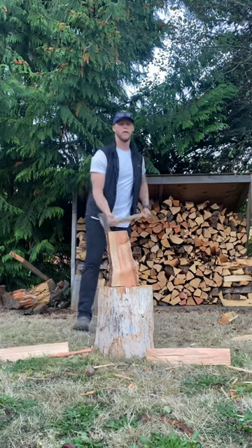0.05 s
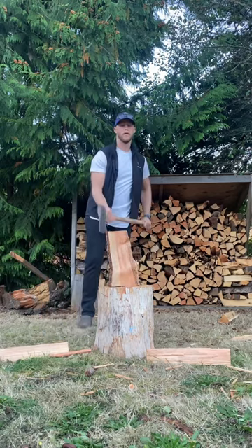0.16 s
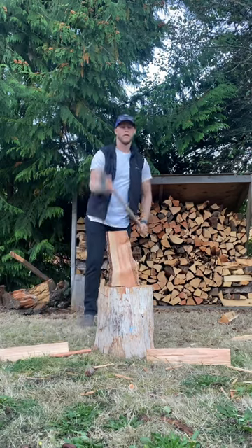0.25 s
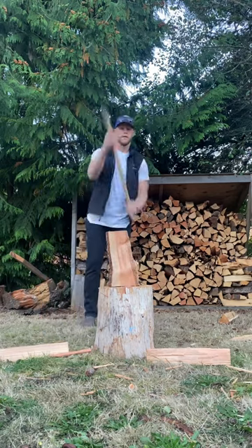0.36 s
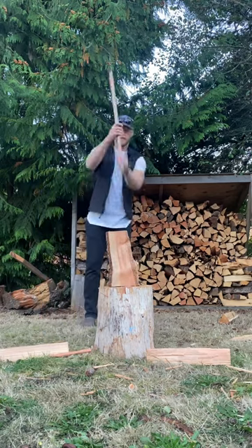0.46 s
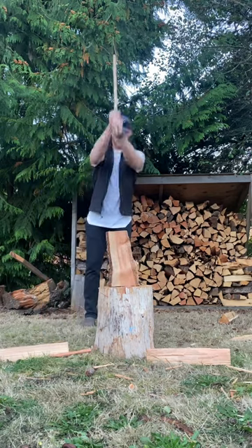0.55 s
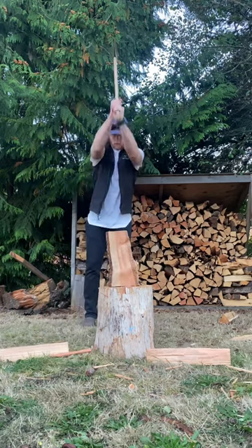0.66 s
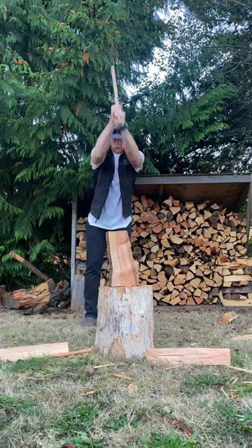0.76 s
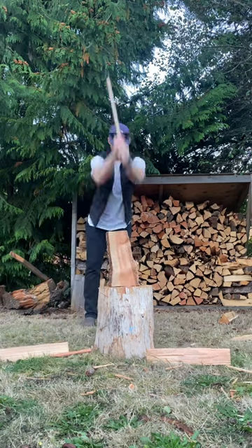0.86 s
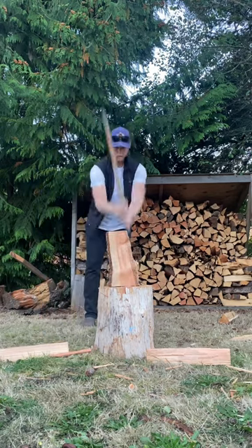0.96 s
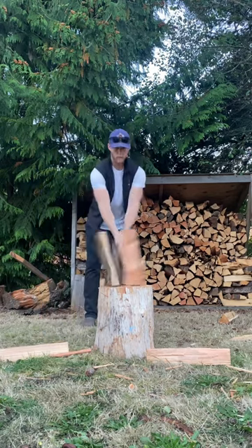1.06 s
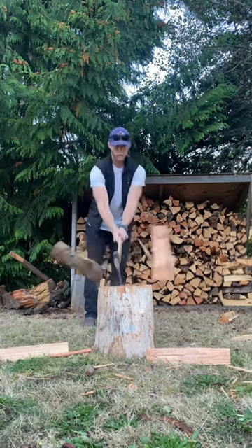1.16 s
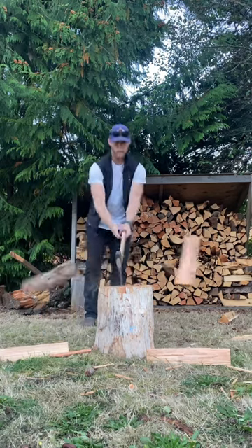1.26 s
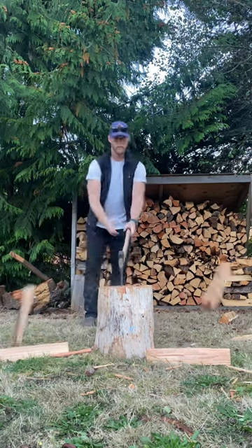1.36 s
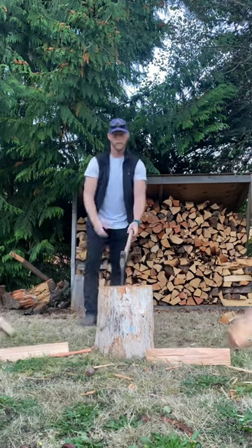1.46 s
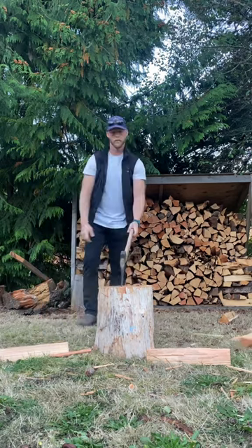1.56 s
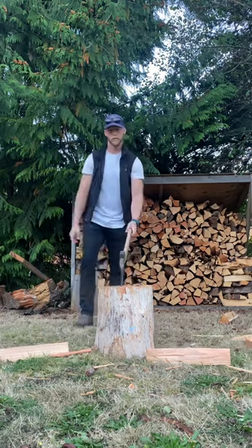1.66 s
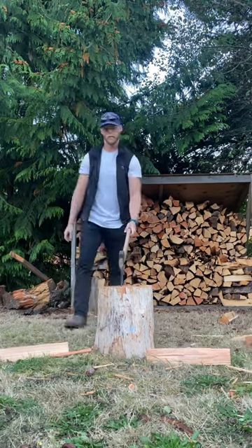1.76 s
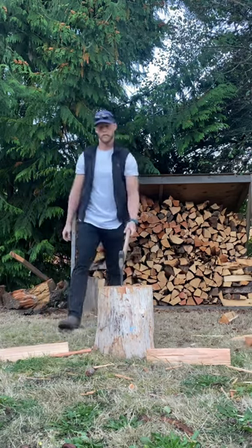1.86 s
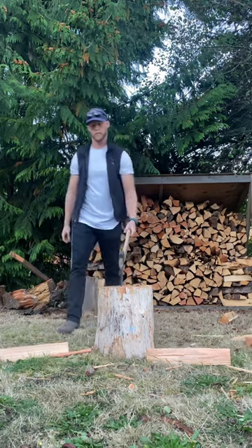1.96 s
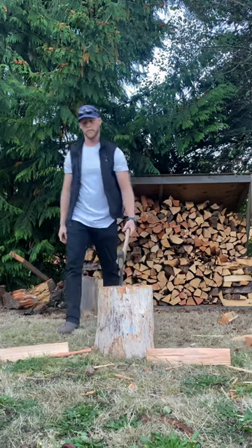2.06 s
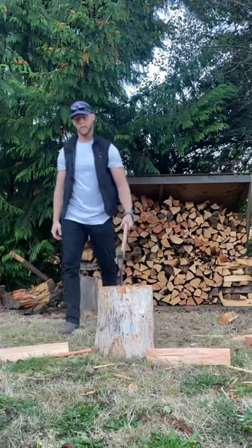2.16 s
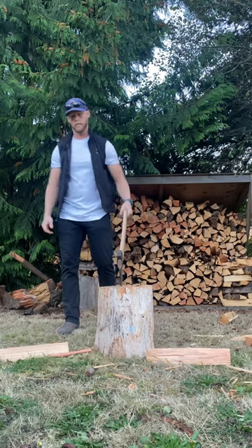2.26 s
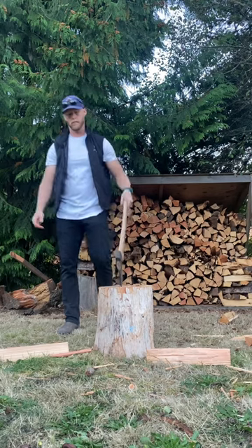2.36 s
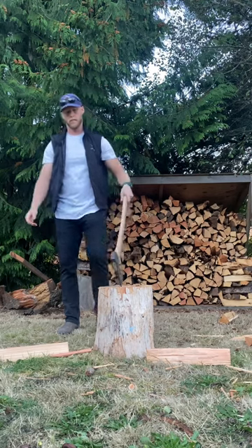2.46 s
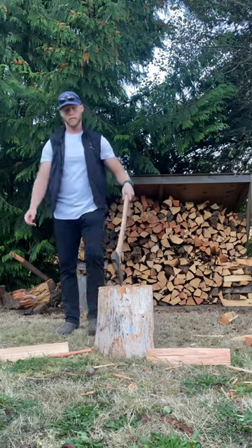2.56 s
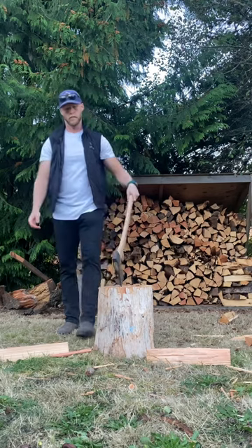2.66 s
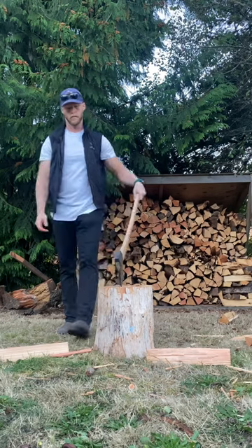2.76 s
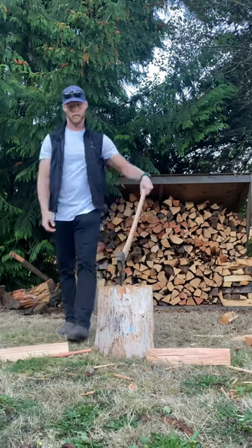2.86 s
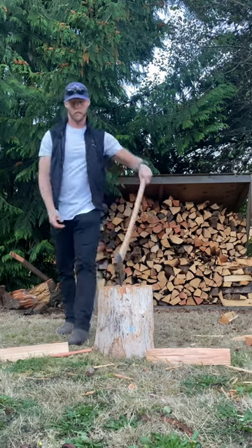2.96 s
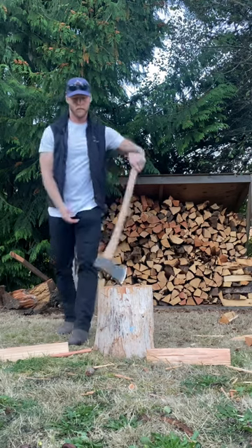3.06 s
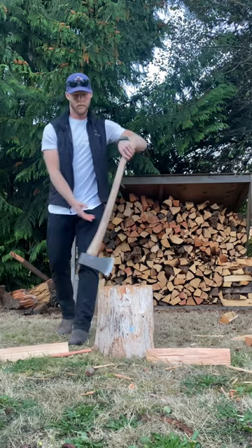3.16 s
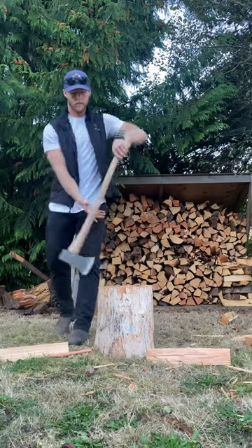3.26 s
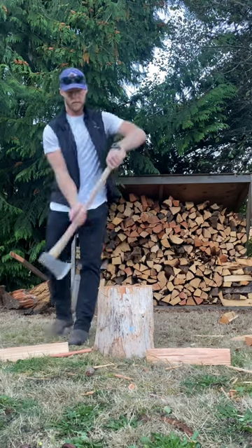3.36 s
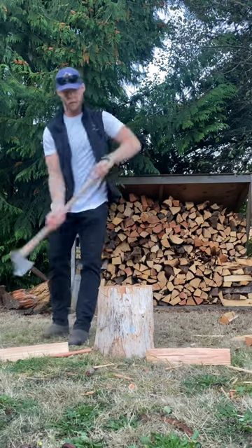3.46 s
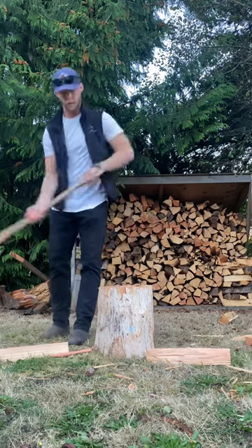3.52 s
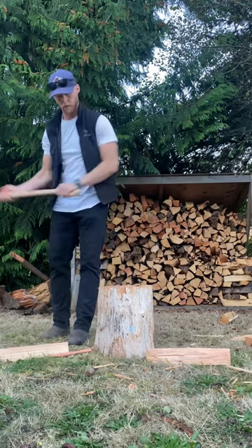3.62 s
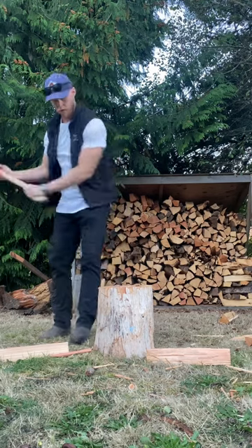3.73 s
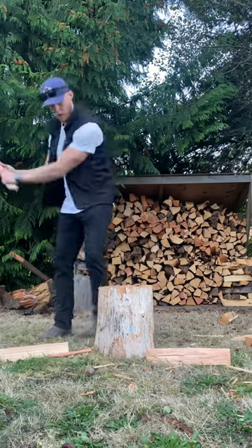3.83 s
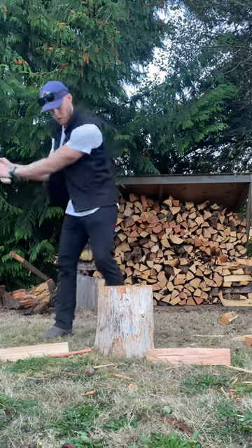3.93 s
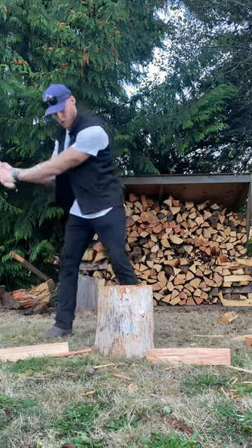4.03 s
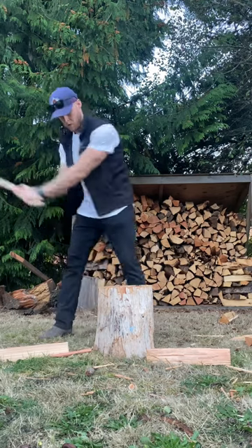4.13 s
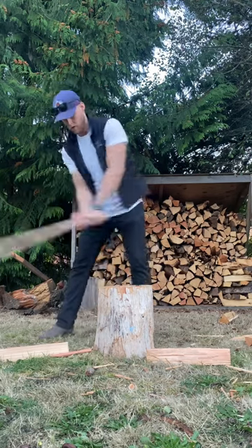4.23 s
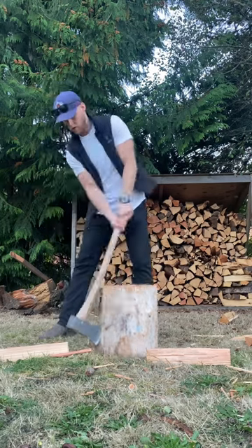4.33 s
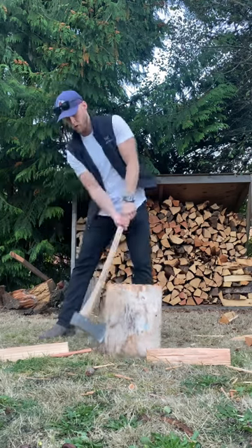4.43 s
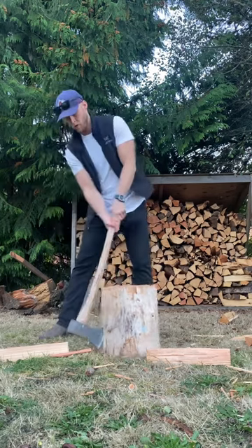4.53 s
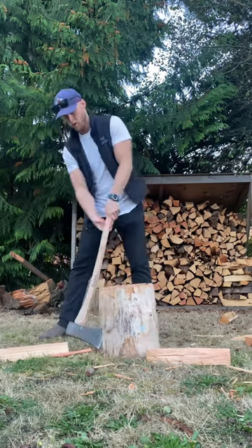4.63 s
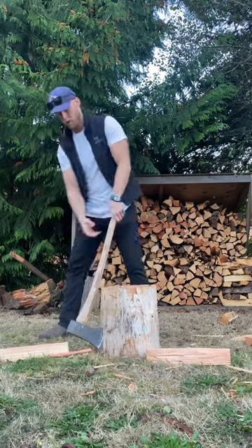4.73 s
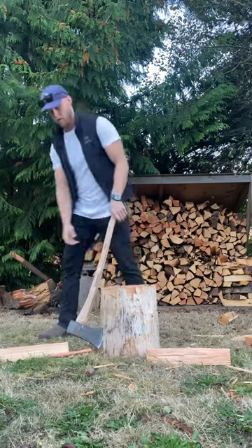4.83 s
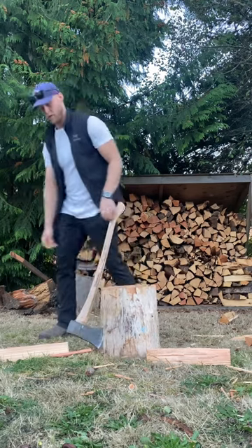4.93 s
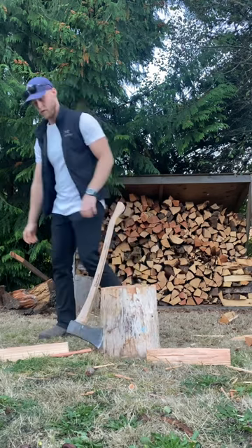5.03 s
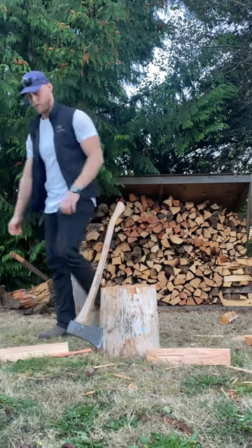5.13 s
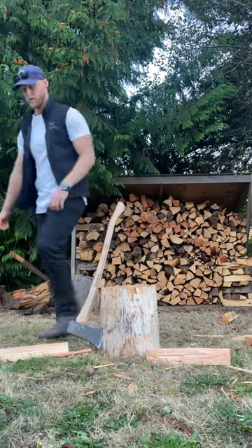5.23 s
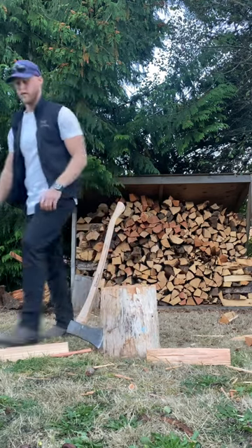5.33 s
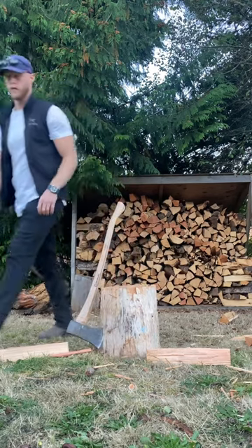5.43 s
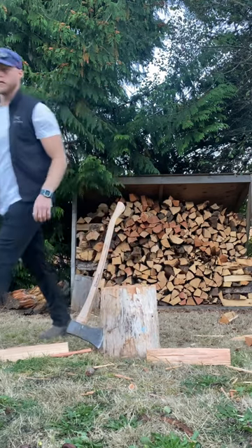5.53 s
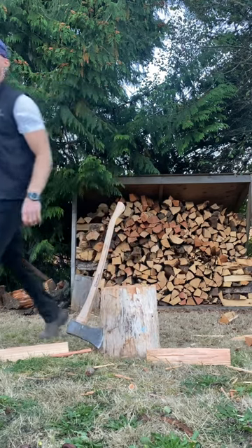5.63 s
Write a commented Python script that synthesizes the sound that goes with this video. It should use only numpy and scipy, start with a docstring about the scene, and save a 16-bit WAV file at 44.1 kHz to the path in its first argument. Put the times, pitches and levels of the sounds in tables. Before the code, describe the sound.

An axe splits a log with a loud crack, halves thud and clack, then a second sharp chop bites the block as birds twitter outdoors.

```python
"""A garden, with a phone a few metres off: distant traffic hums, a small bird twitters, clothes and grass rustle.
Twigs snap and boots thud softly, then an axe splits a log on a chopping block: noise bursts ring its modes.
The halves thud on the grass as sagging low tones and clack against other wood, a click and a short ring.
A second, low swing bites into the side of the block and rings that instead; the axe head thuds on the ground.
Woodpile and trees throw the blows back as scattered, fading echoes."""
import sys
import numpy as np
from scipy import signal
from scipy.fft import rfft, irfft
from scipy.io import wavfile

SR = 44100
rng = np.random.default_rng(int(sys.argv[2]) if len(sys.argv) > 2 else 0)


def master_out(mix):
    """Clip the mix to full scale and print it as 16-bit PCM to the path in sys.argv[1]."""
    frames = np.transpose(np.atleast_2d(mix))
    ceiling = np.clip(frames, -1, 1)
    pcm = np.round(ceiling * 32767).astype(np.int16)
    wavfile.write(sys.argv[1], SR, pcm)


N = 250784
T = np.arange(N) / SR
HIT_T = T[:SR // 2]  # time axis of one blow
SECOND_SWING_S = 3  # blows after this belong to the second swing


def undb(db):
    """Decibels to amplitude gain."""
    return 10 ** (np.asarray(db) / 20)


def along(points, hz):
    """Gain read from a (Hz, dB) table on a log-frequency axis."""
    table_hz, db = np.transpose(points)
    return undb(np.interp(np.log(hz), np.log(table_hz), db))


def fade(t, t60):
    """Exponential decay, 60 dB down after t60 seconds."""
    return np.exp(-np.log(1000) * t / t60)


def swell(middle_s, half_s):
    """A smooth, bell-shaped rise and fall around one moment."""
    return np.exp(-((T - middle_s) / half_s) ** 2)


def wander(t, step):
    """Random values drawn every few samples and joined by straight lines."""
    knots = t[::step]
    return np.interp(t, knots, rng.standard_normal(len(knots)))


def add(out, start_s, x):
    """Mix x into out from start_s, dropping what runs past the end."""
    i = max(int(start_s * SR), 0)
    out[:, i:i + x.shape[-1]] += x[..., :max(N - i, 0)]


def noise(colour, side, size, tilt_db=0):
    """Stereo noise of rms 1, shaped in spectrum and in width; the tilt is in dB per octave."""
    hz = np.maximum(np.fft.rfftfreq(size, 1 / SR), 1)
    mid, other = rfft(rng.standard_normal((2, size)))
    width = along(side, hz)
    gain = along(colour, hz) * undb(tilt_db * np.log2(hz)) / np.sqrt(1 + width ** 2)
    x = irfft(gain * np.array([mid + width * other, mid - width * other]), size)
    return x / x.std()


# Stereo width of sounds close by at the microphone pair. Each row: frequency in Hz, side against mid in dB.
NEAR_SIDE = [(100, -14), (1000, -16), (2400, -9), (4400, -8), (8000, -1), (15000, -0.5)]


def burst(colour, t60, tilt_db=0, grain_db=3, rise_s=0.00008):
    """Breaking fibres: a sharp burst of noise with a grainy level that rises at once and dies away."""
    size = len(HIT_T)
    grain = undb(grain_db * wander(HIT_T, 16))
    grain = grain / np.sqrt(np.mean(grain ** 2))
    envelope = fade(HIT_T, t60) * (1 - np.exp(-HIT_T / rise_s))
    return noise(colour, NEAR_SIDE, size, tilt_db) * grain * envelope


def ring(modes, push_s, ratio=1, spread_hz=1300):
    """Damped modes that build up while the blow pushes; high ones reach the two ports out of step."""
    t = HIT_T * ratio  # a higher ratio raises the pitch and shortens the decay
    x = 0
    for k, (hz, db, t60) in enumerate(modes):
        skew = .2 * min(hz / spread_hz, 2) * rng.choice([-1, 1]) * np.array([[1], [-1]])  # radians
        # neighbouring modes swing in opposite senses
        x = x + (-1) ** k * undb(db) * fade(t, t60) * np.sin(2 * np.pi * hz * t + skew)
    return x * (1 - np.exp(-HIT_T / push_s))


# Stereo width of sounds from far off. Each row: frequency in Hz, side against mid in dB.
FAR_SIDE = [(30, -12.5), (100, -19.5), (400, -1.5), (1200, -9), (3000, -3.5), (6000, -0.5)]


def echo(x, colour, t60, build_s, patchy_db=2.5):
    """Scattered reflections that arrive in clumps, build up and die away."""
    t = T[:int(1.5 * SR)]
    clumps = wander(t, 220)
    shape = fade(t, t60) * (1 - np.exp(-t / build_s)) * undb(patchy_db * clumps)
    response = noise(colour, FAR_SIDE, len(t)) * shape / np.linalg.norm(shape)
    mono = x.mean(axis=0)[None]
    return signal.fftconvolve(mono, response, axes=1)[:, :N]


# Spectrum of the open air and far traffic. Each row: frequency in Hz, relative density in dB.
AIR_COLOUR = [(15, -49.5), (25, -18.5), (38, -3), (59, 2.5), (145, -6.5), (249, -24.5), (1020, -20),
              (1740, -27), (2480, -44.5), (3520, -40), (4250, -39.5), (8140, -44), (9070, -56),
              (10400, -48), (16000, -51.5)]
# Drift of the traffic, in three stretches; only its shape counts. Each row: time in seconds, level in dB.
TRAFFIC_LEVEL = [
    [(0.0, -70), (0.444, -68), (0.95, -66)],
    [(2.1, -66.5), (2.37, -69), (4.2, -65)],
    [(4.6, -71), (5.216, -73.5), (5.687, -68)],
]


def air(air_db=-58, follow=0.8):
    """Far traffic and open air: wide, steady noise whose level swells slowly about its median."""
    s, db = np.concatenate(TRAFFIC_LEVEL).T
    drift_db = follow * (np.interp(T, s, db) - np.median(db))
    return noise(AIR_COLOUR, FAR_SIDE, N) * undb(air_db + drift_db)


def whistle(hz, fall=.12, waver=.014):
    """One short bird note: a wavering sine that slides downward, by fractions of its pitch."""
    u = np.linspace(0, 1, int(.042 * SR))
    shake = np.interp(u, np.linspace(0, 1, 16), rng.standard_normal(16))
    pitch = hz * (1 - fall * rng.uniform(.7, 1.3) * u ** 2 + waver * shake)
    return np.sin(np.pi * u) * (1 - u) * np.sin(2 * np.pi * np.cumsum(pitch) / SR)


# Echo off the woodpile and yard. Each row: frequency in Hz, relative density in dB.
YARD_COLOUR = [(60, 2.5), (200, 1), (450, -7.5), (800, -2.5), (1200, 6), (2000, 1), (2800, -3.5),
               (5000, -2.5), (8000, -5), (16000, -6)]
# The near bird's phrase of three falling notes. Each row: start in seconds, level in dB.
PHRASES = [(.357, -59.5), (2.018, -61), (2.96, -58.5), (3.737, -60), (4.935, -64), (5.53, -64.5)]


def birds(count=190, scatter_db=2):
    """A near bird twitters at a roughly even pace, its phrases on top; others chatter deeper in the trees."""
    near, far = np.zeros((2, 2, N))
    note_step_s = .062
    for s, db in PHRASES:
        for k, accent_db in enumerate([-4.5, 0, 0]):  # the first note is softer
            add(near, s + k * note_step_s, undb(db + accent_db) * whistle(4300))
    # the twitter is higher and softer than the phrase
    for k, (late, sharp, loud) in enumerate(rng.standard_normal((count, 3))):
        hz = 4920 * (1 + .07 * np.tanh(sharp))
        add(near, (k + late / 4) * note_step_s, undb(-73 + scatter_db * loud) * whistle(hz))
    for s, sharp in rng.uniform([0, -.07], [N / SR, .07], (count, 2)):
        add(far, s, undb(-69) * whistle(4750 * (1 + sharp)))
    # the far birds are heard only by their echo
    return near + echo(undb(-9) * near + far, YARD_COLOUR, t60=0.3, build_s=0.0045)


# Spectrum of cloth and dry grass. Each row: frequency in Hz, relative density in dB.
RUSTLE_COLOUR = [(200, 1), (1000, -2), (2500, -7.5), (4500, -4.5), (7000, -0.5), (11000, 1), (16000, -3)]
# Moves of the body. Each row: middle in seconds, half length in seconds, level in dB.
MOVES = [(0.137, 0.38, -65), (0.423, 0.11, -67.5), (0.498, 0.011, -58.5), (.6, 0.09, -85),
         (0.977, 0.074, -69), (1.38, 0.015, -63), (1.487, 0.04, -54), (1.705, 0.18, -62),
         (1.919, 0.052, -61.5), (2.181, 0.21, -72), (2.47, 0.17, -77.5), (2.63, 0.054, -62.5),
         (2.89, .08, -73), (3.271, 0.13, -66.5), (3.44, .07, -66.5), (3.768, 0.13, -65),
         (4.251, 0.091, -65.5), (4.663, .18, -78), (5.424, .025, -67), (5.597, 0.15, -69.5)]


def rustle(grain_db=3):
    """Each move of the body stirs cloth and dry grass into crackling noise."""
    motion = np.sqrt(sum((undb(db) * swell(s, half_s)) ** 2 for s, half_s, db in MOVES))
    return noise(RUSTLE_COLOUR, NEAR_SIDE, N) * motion * undb(grain_db * wander(T, 60))


# Spectrum of dry wood clicking. Each row: frequency in Hz, relative density in dB.
CLACK_COLOUR = [(200, 0.5), (700, 3.5), (1500, 6), (3000, -2), (5500, 4.5), (8000, 13.5), (11000, 11.5),
                (16000, 8.5)]
# Twigs underfoot. Each row: start in seconds, level in dB.
SNAPS = [(0.066, -60), (.2187, -54), (1.4303, -54), (3.4303, -50.5), (3.51, -52.5), (3.8396, -53.5),
         (5.5923, -52)]


def twigs():
    """A twig snapping underfoot only clicks: a brief burst without a ring."""
    out = np.zeros((2, N))
    for s, db in SNAPS:
        add(out, s, undb(db) * burst(CLACK_COLOUR, t60=0.018))
    return out


# Spectrum of soil and grass under a settling weight. Each row: frequency in Hz, relative density in dB.
SCUFF_COLOUR = [(30, -19), (70, 1.5), (250, 0), (450, -13), (800, -27), (2000, -32.5), (8000, -56)]
# Heavy wood, boots and the axe head meeting the ground. Each row: start in seconds, level in dB,
# middle pitch in Hz, swell time in seconds, scuff against the swing in dB.
THUDS = [(0.171, -49.5, 79.2, 0.02, 2.5), (.2750, -50, 58, 0.037, 0), (1.0182, -12.5, 205, 0.00098, -17),
         (1.06, -30, 88, 0.009, 0), (1.38, -25.5, 137, 0.009, -10), (1.466, -38, 201.2, 0.0037, -0.5),
         (1.4865, -18.5, 193, 0.002, -8.5), (1.5030, -41, 239, 0.0078, -2),
         (1.588, -39.5, 103.6, 0.012, -8), (1.9310, -44, 229, 0.0018, -6.5),
         (1.948, -40.5, 114, 0.0055, -16), (4.3071, -28, 274.4, 0.0036, -4.5),
         (4.3760, -39.5, 168, 0.0063, -4.5), (4.493, -49.5, 129.2, 0.0065, -5),
         (5.4080, -44.5, 129.5, 0.0021, -1)]


def thuds(sag=0.5, scuff_t60=0.093):
    """Soft soil gives a few low swings that sag in pitch, and a dull scuff as the weight settles."""
    out = np.zeros((2, N))
    for s, db, hz, swell_s, scuff_db in THUDS:
        age = HIT_T / swell_s
        # from half above the middle pitch down towards half below it
        pitch = hz * (1 + sag * (2 * np.exp(-age / 2) - 1))
        swing = age * np.exp(1 - age) * np.sin(2 * np.pi * np.cumsum(pitch) / SR)
        settle = fade(HIT_T, scuff_t60) * (1 - np.exp(-2 * age))
        scuff = noise(SCUFF_COLOUR, NEAR_SIDE, len(HIT_T)) * settle
        add(out, s, undb(db) * (swing + undb(scuff_db) * scuff))
    return out


# Swishes of the haft in the hands, of sleeves and of a boot. Each row: middle in seconds,
# half length in seconds, centre in Hz, width in Hz, level in dB.
SLIDES = [(0.444, 0.052, 6700, 1800, -59.5), (3.458, 0.093, 1170, 2280, -63.5),
          (3.79, 0.17, 1027, 2028, -69.5), (5.414, 0.006, 580, 597, -52.5)]


def slides():
    """Haft, sleeves and boot hiss as they slide: noise through one resonance, swelling and fading."""
    out = np.zeros((2, N))
    for s, half_s, hz, width_hz, db in SLIDES:
        b, a = signal.iirpeak(hz, hz / width_hz, SR)
        hiss = signal.lfilter(b, a, noise(RUSTLE_COLOUR, NEAR_SIDE, N))
        out += undb(db) * hiss / hiss.std() * swell(s, half_s)
    return out


# Spectrum of cracking fibres, before the tilt. Each row: frequency in Hz, relative density in dB.
CRACK_COLOUR = [(150, -8.5), (700, -1), (2000, 2), (3200, -1), (5000, -1), (7000, 0), (11000, -4),
                (16000, -8)]
# The blade bites and drives in. Each row: start in seconds, crack level in dB, crack t60 in seconds,
# tilt in dB per octave, ring level in dB.
CRACKS = [(1.0150, -9, 0.026, -1, -2), (1.0202, -16.5, 0.018, -.3, -38), (4.2856, -8, 0.014, 2, -27),
          (4.2871, -15, 0.012, -0.5, -2.5), (4.2899, -26, 0.046, -3.5, -22)]
# Fibres tearing one after another as the log opens. Each row: start in seconds, level in dB.
TEARS = [(1.0300, -20.5), (1.0426, -21.5), (1.056, -23.5), (1.0750, -30), (1.1, -39), (1.148, -45)]
# Modes of the log. Each row: frequency in Hz, level in dB, t60 in seconds.
LOG = [(560, -19, 0.016), (648, -14.5, 0.018), (906, -12.5, 0.035), (1113, -9.5, 0.018), (1510, -9.5, 0.02),
       (2110, -9.5, 0.042), (2233, -18.5, 0.045), (4630, -22, 0.069)]
# Modes of the block with the axe in it. Each row: frequency in Hz, level in dB, t60 in seconds.
BLOCK = [(89, -21.5, 0.1), (202, -23, 0.15), (282, -18.5, 0.059), (485, -17, 0.046), (594, -13.5, 0.035),
         (890, -10.5, 0.023), (1127, -2.5, .02), (1273, -12, 0.045), (1484, -11, 0.037), (1920, -13, 0.023),
         (2560, -15, 0.034), (3394, -16.5, 0.015)]


def axe():
    """Each crack of the fibres sets the wood ringing: first the log, on the second swing the block."""
    cracks, body = np.zeros((2, 2, N))
    blows = list(CRACKS)
    for s, db in TEARS:
        # tears grow duller by 54.5 dB per octave each second, down to a limit
        tilt_db = max(-54.5 * (s - TEARS[0][0]), -3.5)
        blows.append((s, db, .034, tilt_db, db - 0.5))
    for s, db, t60, tilt_db, ring_db in blows:
        add(cracks, s, undb(db) * burst(CRACK_COLOUR, t60, tilt_db, grain_db=1.5))
        if s < SECOND_SWING_S:
            wood = ring(LOG, push_s=.0008)
        else:
            wood = ring(BLOCK, push_s=0.0005)
        add(body, s, undb(ring_db) * wood)
    return cracks, body


# Modes of a split billet at pitch ratio 1. Each row: frequency in Hz, level in dB, t60 in seconds.
BILLET = [(1795, -6, 0.055), (2270, -16, .06), (2700, -6, 0.02), (3340, -18, 0.05), (4140, -10.5, 0.066),
          (4409, -16, .04), (5000, -5, 0.031), (5367, -13, 0.063), (6072, -9, .04), (7160, -14.5, 0.045)]
# A billet knocking on other wood. Each row: start in seconds, click level in dB, ring level in dB, pitch ratio.
CLACKS = [(1.573, -17, -28.5, 1), (1.592, -35, -40, 1.22), (1.724, -38, -48, 1.05),
          (1.9096, -33, -37.5, 1.565)]


def clacks():
    """Dry wood on wood: a click of noise and a short ring of the billet's modes."""
    out = np.zeros((2, N))
    for s, click_db, ring_db, ratio in CLACKS:
        click = undb(click_db) * burst(CLACK_COLOUR, t60=0.0099)
        add(out, s, click + undb(ring_db) * ring(BILLET, 0.00049, ratio))
    return out


# Echo from the trees further off. Each row: frequency in Hz, relative density in dB.
TREES_COLOUR = [(60, -15.5), (400, -14), (1000, -5.5), (1500, -1), (2100, 4), (2800, -3.5), (4500, -13),
                (9000, -20), (16000, -23)]


def scene():
    """All blows echo off the woodpile; the cracks reach the trees too, the second swing far more weakly."""
    background = air() + birds() + rustle() + slides()
    knocks = twigs() + thuds() + clacks()
    cracks, body = axe()
    blows = cracks + undb(-15) * body + undb(1.0) * knocks
    yard = undb(-18.0) * echo(blows, YARD_COLOUR, t60=.42, build_s=0.01)
    carry = np.where(T < SECOND_SWING_S, undb(-21.0), undb(-42.5))
    trees = echo(cracks * carry, TREES_COLOUR, t60=1.7, build_s=0.019)
    # the ringing wood and the knocks reach the right port a little louder
    direct = cracks + (body + knocks) * undb(np.array([[-.6], [.6]]))
    return direct + yard + trees + background


# Dips in the phone microphone's response. Each row: centre in Hz, width in Hz, depth in dB.
PORT_DIPS = [(9030, 540, -22.5), (13370, 750, -14)]


def record(dry):
    """The phone rounds the loudest peaks, notches the treble, thins the deep bass and cuts the top."""
    rounded = 1.478 * np.tanh(dry / 1.192)
    hz = np.fft.rfftfreq(N, 1 / SR)
    dips_db = sum(db * np.exp(-((hz - centre) / width) ** 2) for centre, width, db in PORT_DIPS)
    x = irfft(rfft(rounded) * undb(dips_db), N)
    x = signal.sosfilt(signal.butter(2, 30, "high", fs=SR, output="sos"), x)
    return signal.sosfilt(signal.ellip(8, .2, 70, 15950, fs=SR, output="sos"), x)


dry = scene()
out = record(dry)
master_out(out)
```